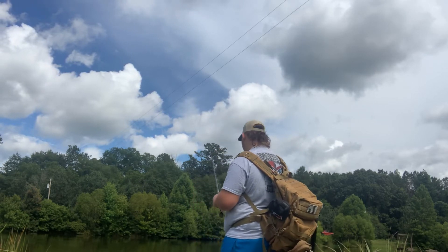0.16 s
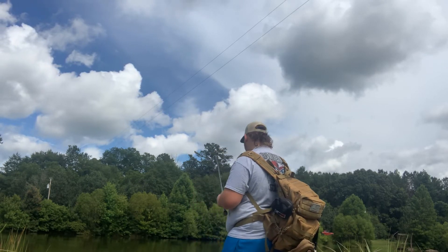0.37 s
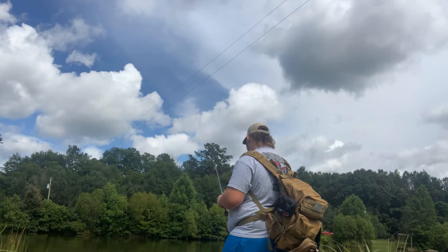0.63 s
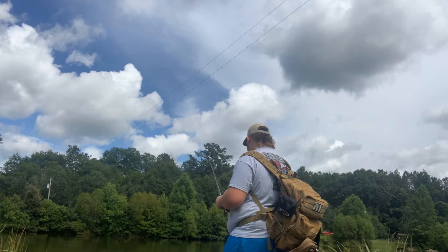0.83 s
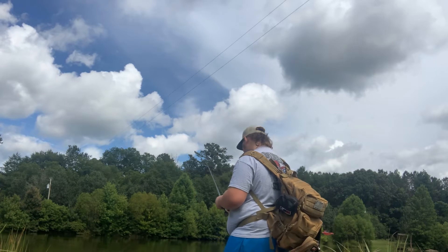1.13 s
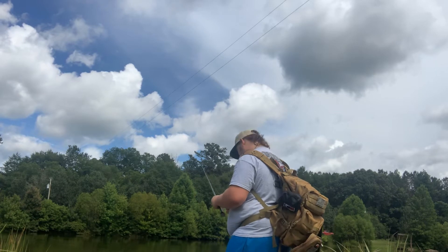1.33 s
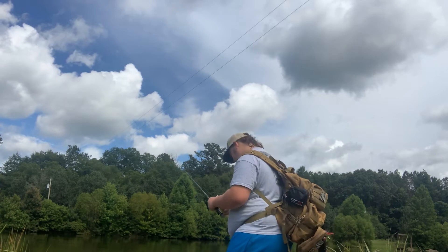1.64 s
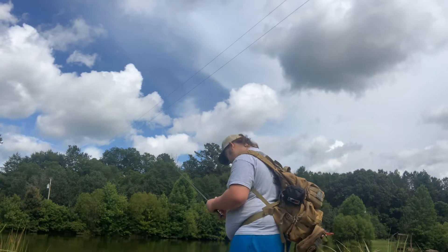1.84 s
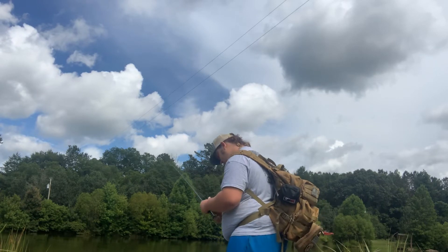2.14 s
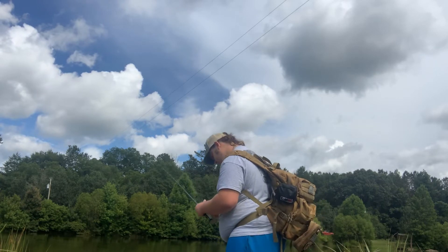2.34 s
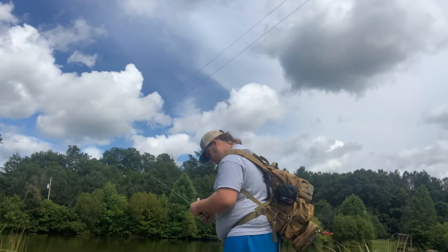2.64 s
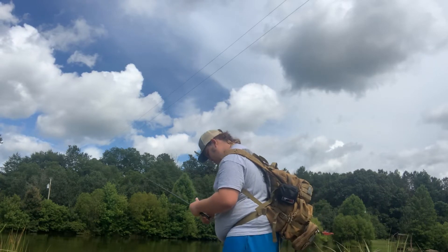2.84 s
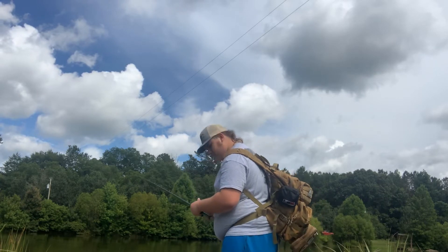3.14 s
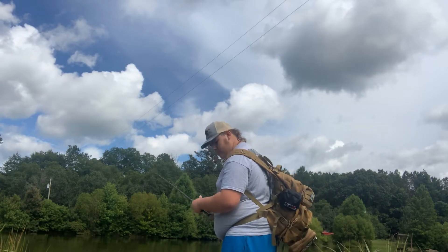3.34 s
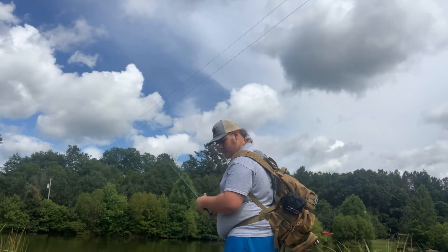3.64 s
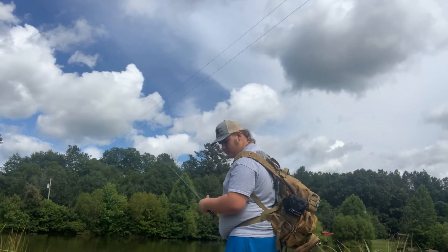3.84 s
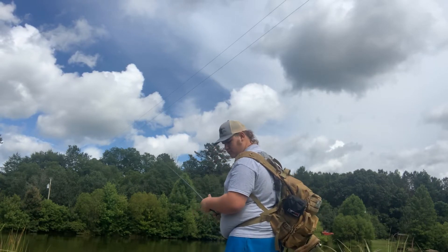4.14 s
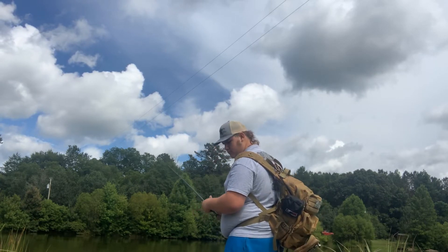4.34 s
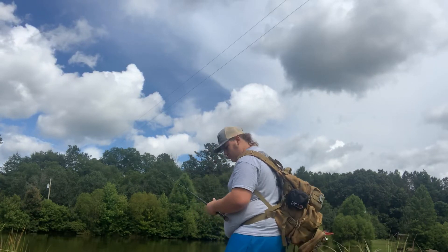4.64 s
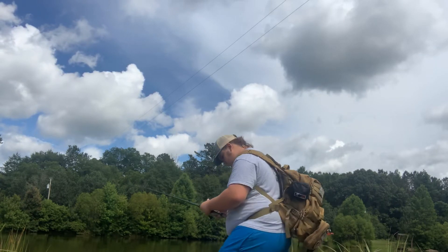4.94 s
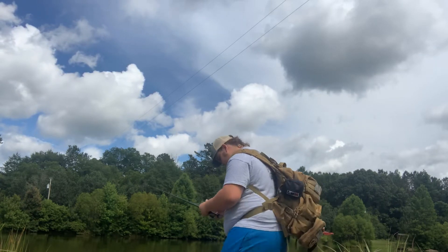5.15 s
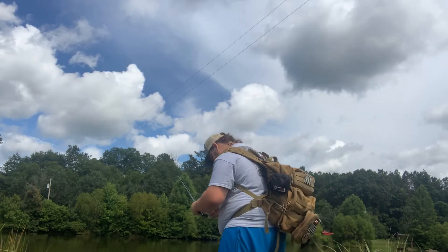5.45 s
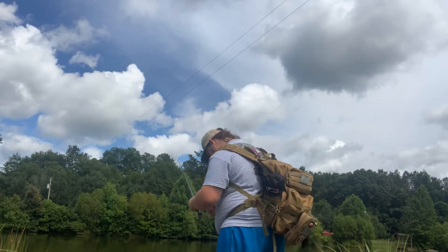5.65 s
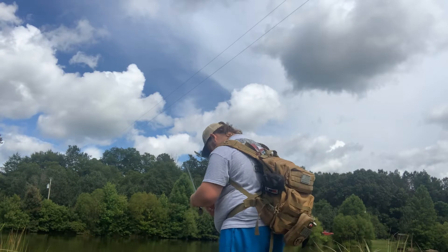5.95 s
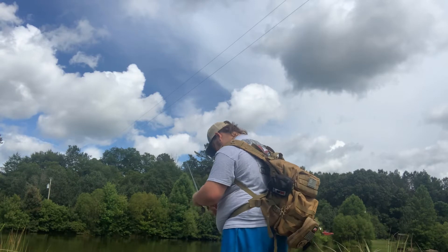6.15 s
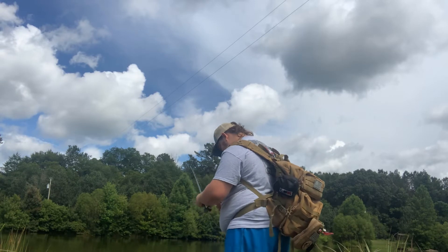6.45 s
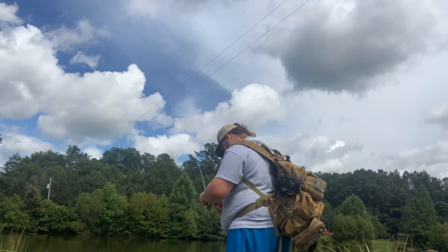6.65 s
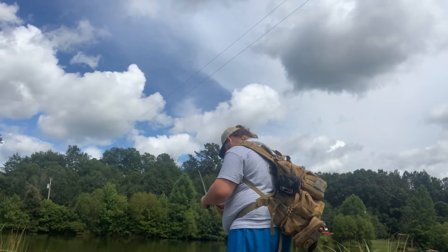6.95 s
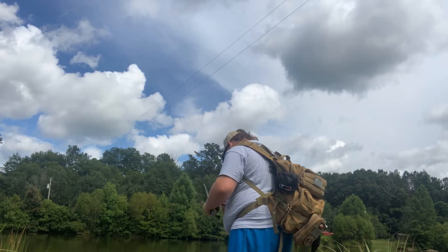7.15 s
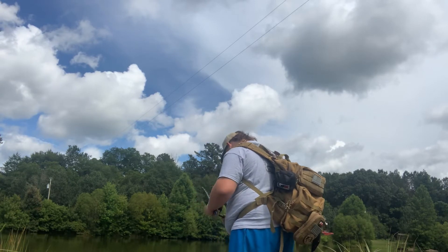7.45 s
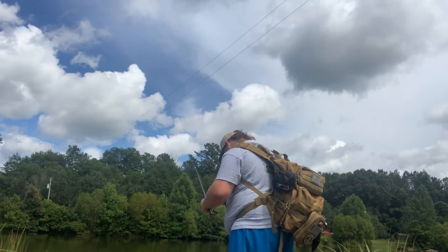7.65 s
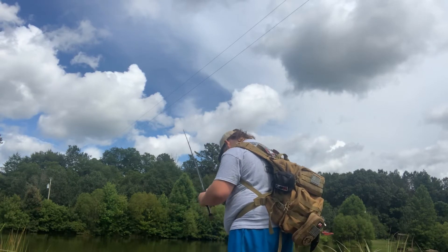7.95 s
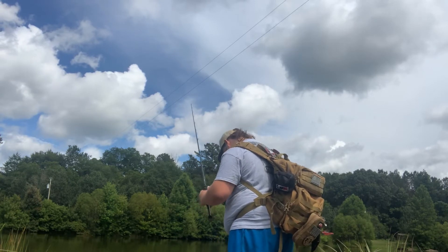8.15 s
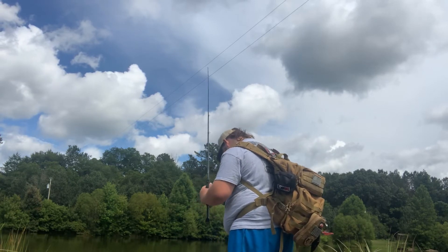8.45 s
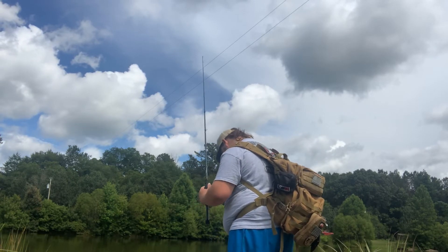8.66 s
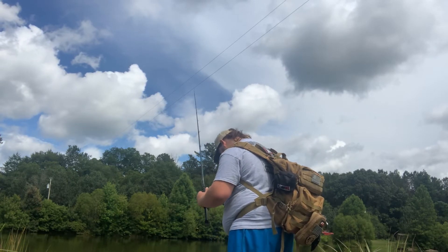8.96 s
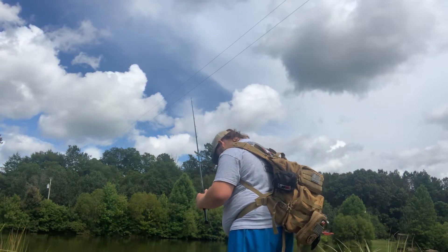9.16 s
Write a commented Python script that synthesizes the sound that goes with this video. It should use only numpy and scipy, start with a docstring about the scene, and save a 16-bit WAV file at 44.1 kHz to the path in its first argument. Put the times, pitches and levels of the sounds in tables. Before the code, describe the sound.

Beside a pond, a far engine throbs away as someone steps through crackling stems, over soft insect buzz and swallow twitter.

```python
"""At the edge of a pond, one microphone. On a far road beyond the water a vehicle drones past,
its exhaust note and drive-line whine sinking as it recedes. A few steps away an angler shifts
in the reeds: wet ground pops underfoot, dry stems snap and rustle. Cicadas buzz with their
ribbed drums, crickets trill, and swallows twitter over the water, echoed by pond and trees."""
import sys
import numpy as np
from scipy import signal
from scipy.io import wavfile
from scipy.ndimage import uniform_filter1d, map_coordinates

SR = 44100
rng = np.random.default_rng(int(sys.argv[2]) if len(sys.argv) > 2 else 0)


def master_out(mix):
    """Clip the mix to full scale and print it as 16-bit PCM to the path in sys.argv[1]."""
    frames = np.transpose(np.atleast_2d(mix))
    ceiling = np.clip(frames, -1, 1)
    pcm = np.round(ceiling * 32767).astype(np.int16)
    wavfile.write(sys.argv[1], SR, pcm)


N = 409688
T = np.arange(N) / SR

# exhaust note from across the pond: (time [s], level [dB])
EXHAUST_LEVEL = [(0, -36), (.5, -44), (.8, -35.5), (1.05, -41), (1.45, -34.5), (1.75, -36.5), (2.07, -43.5),
                 (2.4, -36.5), (3.3, -36), (3.8, -42.5), (4.02, -51), (4.3, -43), (5.1, -40.5),
                 (6.15, -39.5), (6.45, -52.5), (6.8, -42), (7.7, -47), (8.25, -57), (8.6, -48), (9.05, -49),
                 (9.29, -66)]
# spells in which it throbs: (first crest [s], last crest [s], throbs [count], depth [0-1])
EXHAUST_THROBS = [(.14, 1.47, 4, .92), (2.42, 3.87, 8, .45)]
# drive line: (time [s], whine [dB], its half order [dB], low drone [dB])
DRIVE_LEVELS = [(0, -62, -70, -45.5), (.45, -62.5, -60, -40.5), (.76, -60.5, -44.5, -40.5),
                (.88, -52, -42.5, -38), (1.5, -49.5, -37, -43.5), (1.75, -58.5, -41.5, -45),
                (2.0, -53.5, -39.5, -49), (2.25, -60.5, -42, -44.5), (2.5, -70.5, -46.5, -50),
                (3.2, -59, -49.5, -50), (4.0, -67, -58.5, -44), (4.7, -64.5, -48, -52),
                (5.5, -67, -55, -46), (6.3, -62.5, -81, -50), (7.1, -67, -65, -59), (7.55, -61, -76, -54),
                (8.2, -69, -76, -70), (9.29, -67.5, -53, -67)]
# drive-line whine: (time [s], pitch [Hz])
WHINE_PITCH = [(0.0, 425.7), (1.2, 413.0), (2.1, 403.4), (3.2, 390.2), (4.6, 376.2), (5.6, 356.0),
               (9.3, 345.0)]
# rough howl on the approach: (time [s], pitch [Hz], level [dB])
APPROACH_HOWL = [(.3, 844, -71), (.4, 840, -53.5), (.55, 804, -52), (.68, 818, -56), (.78, 796, -75)]
# far road, with a swell near 5 s as the angler moves: (time [s], low roar [dB], hiss [dB])
ROAD_LEVELS = [(0, -39, -53), (1.5, -36.5, -56), (2.7, -40.5, -57), (3.4, -48.5, -60.5), (5, -44.5, -56.5),
               (6.9, -56, -62), (9.29, -55, -64.5)]
# low roar: (frequency [Hz], relative level [dB])
ROAR_SPECTRUM = [(24, -35), (40, -8), (65, -8), (139, -0.5), (209, -2.5), (399, -17), (460, -32),
                 (571, -35.5), (700, -27.5), (910, -52), (1540, -120)]
# road hiss: (frequency [Hz], relative level [dB])
HISS_SPECTRUM = [(260, -44.5), (450, -3), (593, -10), (712, -0.5), (1040, -3), (1590, -6), (2520, -25.5),
                 (2800, -23), (3640, -23), (6160, -120)]
# wet ground, close by: (time [s], level [dB], ring [Hz], time to fall 60 dB [s])
GROUND_POPS = [(1.891, -35, 1300, .013), (2.144, -34, 795, 0.015), (2.145, -27.5, 580, 0.017),
               (2.646, -39.5, 600, 0.023), (2.643, -41.5, 1330, 0.018), (4.704, -41, 1360, 0.056),
               (4.761, -30, 1520, 0.024), (4.763, -29.5, 685, 0.058), (4.785, -29, 1660, 0.023),
               (4.788, -27, 730, 0.063), (4.828, -31.5, 1040, 0.034), (4.902, -34, 1160, .018),
               (4.907, -35, 1300, 0.013), (4.964, -38, 1220, 0.035), (5.044, -38, 1110, 0.035),
               (5.067, -35, 702, 0.049), (5.109, -39.5, 1390, 0.028), (5.131, -41, 1800, .025),
               (5.144, -26.5, 687, 0.021), (5.16, -35.5, 496, 0.023), (5.186, -28.5, 383, 0.039),
               (5.387, -42, 1370, .033), (5.568, -43.5, 900, 0.06)]
# dry stems breaking: (time [s], level [dB], ring [Hz])
STEM_SNAPS = [(0.969, -50.5, 6300), (1.893, -55, 6600), (4.752, -46, 6150), (4.761, -44, 4050),
              (4.785, -41, 5400), (4.8064, -44, 5440), (4.8165, -33, 3020), (4.825, -36, 5300),
              (4.8334, -42, 5700), (4.9016, -36, 5400), (4.9143, -41, 6160), (4.9189, -32.5, 3620),
              (4.9244, -38, 6060), (4.936, -42, 3500), (5.11, -39, 5100), (5.1396, -38, 3320),
              (5.1598, -43, 3320), (5.1744, -44, 6790), (5.202, -43, 3190), (5.2423, -40.5, 6160),
              (5.271, -36.5, 6360), (5.3028, -36, 8500), (5.3117, -35.5, 6040), (5.336, -33.5, 5070),
              (5.4053, -39, 3100), (5.5994, -52, 5170), (6.1486, -44, 6300), (6.179, -41.5, 5730),
              (6.7294, -50, 5810)]
# brushes through the reeds: (loudest moment [s], swell time constant [s], fizz [dB], body [dB])
REED_BRUSHES = [(4.82, 0.018, -56, -55), (4.915, 0.017, -53, -54.5), (5.05, 0.015, -57, -56),
                (5.14, 0.02, -53.5, -52.5), (5.23, .012, -62, -63), (5.3, 0.023, -50, -59),
                (5.39, 0.02, -60, -55), (5.605, 0.0054, -55, -68), (6.165, 0.013, -66, -67)]
# fizz of brushed stems: (frequency [Hz], relative level [dB])
FIZZ_SPECTRUM = [(2350, -48), (4000, -20), (4660, -2), (5050, -3), (6020, -1), (7600, -9), (8760, -4),
                 (15600, -37)]
# two cicadas: (time [s], first [dB], second [dB])
CICADA_LEVELS = [(0, -65, -79), (.7, -63.5, -74), (1.9, -63, -75), (2.6, -67.5, -78.5), (3.2, -67, -75),
                 (4.3, -73.5, -78), (5.4, -68, -72), (6.1, -66.5, -71.5), (6.45, -67.5, -62.5),
                 (6.95, -68.5, -63), (7.1, -69.5, -72), (9.29, -73, -80.5)]
# one song each: (opening clicks [1/s], closing clicks [1/s], clicks a stroke [count],
# roughness [0-1], drum modes as (frequency [Hz], width [Hz], relative level [dB]))
CICADA_SONGS = [(330.5, 342, 7.75, 0.6, [(4613, 320, -6), (4940, 570, -2.5), (5630, 230, -7),
                (5940, 400, -1.5), (6330, 190, -2), (6570, 160, -7.5)]),
                (349, 300, 3.1, 0.25, [(4800, 340, -7), (5774, 380, 0), (6140, 89, -6.5), (6930, 150, -20),
                (7390, 150, -20.5)])]
# cricket trills: (pitch [Hz], pulses [1/s], level [dB], end [s])
CRICKET_TRILLS = [(8080, 30, -83, 9.3), (10240, 71, -89, 4.7)]
# swallow chirps over the water: (time [s], level [dB], centre [Hz], glide [Hz], length [s])
SWALLOW_CHIRPS = [(0.528, -59.0, 4860, 1500.0, 0.02), (0.707, -66, 3280.0, 1597, 0.012),
                  (0.772, -61.5, 5620, 1499, 0.051), (0.855, -64, 5380.0, 1497, 0.018),
                  (1.64, -62.0, 5800, 1196, 0.026), (1.766, -61, 6280.0, 900.0, 0.013),
                  (1.952, -59, 6220.0, 603, 0.018), (1.967, -65, 3380, 400.0, 0.014),
                  (2.074, -60, 5900, 304, 0.027), (2.172, -61, 5500, 902, 0.028),
                  (2.8, -61, 5530, 903, 0.012), (2.891, -68, 3120, 596, 0.014),
                  (2.908, -61, 6100, 296, 0.056), (3.025, -67, 3400.0, 798, 0.013),
                  (3.222, -69, 3220, 691, 0.018), (3.24, -69, 3280.0, 1200.0, 0.038),
                  (3.574, -68, 3200, 607, 0.023), (3.69, -66, 3720, 1297, 0.028),
                  (3.701, -66.5, 3150, 388, 0.047), (4.462, -65.5, 3540, 1002, 0.025),
                  (4.684, -60, 3170, -2, 0.0091), (5.517, -63, 4480.0, 1800.0, 0.02),
                  (5.623, -67, 3700.0, 1600.0, 0.053), (5.647, -65.0, 4450, 1800.0, 0.02),
                  (5.658, -66, 4960.0, 300.0, 0.013), (5.694, -61, 4870, 597, 0.012),
                  (5.77, -61.5, 4670, 1500.0, 0.014), (5.808, -69, 3760, 1194, 0.032),
                  (6.013, -65, 3100.0, 499, 0.014), (6.03, -59.5, 4780, 1200.0, 0.013),
                  (6.031, -62, 3400, 1000.0, 0.016), (6.308, -63, 3240, 700.0, 0.021),
                  (6.325, -61, 3070, 400.0, 0.018), (6.424, -63, 3280.0, 1000.0, 0.044),
                  (6.463, -62.0, 3100.0, 400.0, 0.014), (6.503, -63, 3660, 1600.0, 0.014),
                  (6.512, -57, 5300, 300.0, 0.012), (6.626, -66, 3960, 1800.0, 0.06),
                  (6.671, -59, 3600, 1200.0, 0.013), (7.121, -65, 3520.0, 1200.0, 0.01),
                  (7.4, -66, 5900, -600.0, 0.038), (7.79, -63, 5800, 1200.0, 0.017),
                  (7.973, -65.5, 3260, 600.0, 0.021), (8.1, -66, 5660, -600.0, 0.042),
                  (8.14, -64, 3180, 400.0, 0.028), (8.163, -66, 3010, 403, 0.015),
                  (8.9, -74, 3300.0, 500.0, 0.018)]
# raspy chips: (time [s], level [dB], centre [Hz], glide [Hz], length [s])
RASPY_CHIPS = [(6.058, -70, 6080, 0, 0.027), (7.879, -61, 5700, -300, 0.046),
               (7.907, -64, 6340, 700, 0.036), (8.05, -61.5, 5850, 500, 0.031),
               (8.239, -61, 5600, -700, 0.03), (8.53, -67, 5400, -300, .02), (8.921, -62, 5500, -2, 0.031)]
# longer whistles, one list each: (time [s], pitch [Hz], level [dB], second harmonic [dB])
BIRD_WHISTLES = [
    [(8.012, 1965, -63, -90), (8.04, 1836, -66, -90), (8.06, 1910, -60, -93), (8.085, 2050, -59, -75),
     (8.108, 1940, -66, -90)],
    [(8.8, 2250, -74, -90), (8.83, 2100, -67, -76), (8.862, 1985, -56, -73), (8.876, 2150, -70, -72),
     (8.89, 2080, -64, -68), (8.912, 1850, -50, -85)],
    [(9.01, 2000, -78, -90), (9.03, 2410, -72, -84), (9.055, 2400, -77, -76), (9.078, 1770, -63, -92)],
    [(7.855, 5600, -66, -99), (7.87, 6050, -59, -99), (7.895, 6000, -60, -99), (7.94, 6240, -62.5, -99),
     (7.967, 6000, -68, -99)],
]
# still air and far traffic: (frequency [Hz], relative level [dB])
AIR_SPECTRUM = [(13, -49), (22, -11), (58, -3.5), (97, 1), (154, -2.5), (267, -22.5), (352, -23.5),
                (476, -51), (1390, -23.5), (2610, -48), (3830, -48), (5790, -51.5), (7410, -53),
                (13900, -60.5), (15600, -96)]
# far machines: (pitch [Hz], width [Hz], level [dB])
MACHINE_HUMS = [(80.5, 1.4, -50), (87.2, 3.8, -54.5)]


def vehicle():
    """Engine and drive line on the far road; moving air on the long path makes them fade, and in spells the
    exhaust throbs."""
    receding_hz, sink_hz, sink_s, throb_fade_s = 130.8, 18.7, 4.0, 0.15
    throb = np.ones(N)
    for first, last, count, depth in EXHAUST_THROBS:
        spell = np.clip(np.minimum(T - first, last - T) / throb_fade_s + 1, 0, 1)
        throb += depth * spell * np.cos(2 * np.pi * count * (T - first) / (last - first))
    hz = receding_hz + sink_hz * np.exp(-T / sink_s) + 0.58 * wander(11)
    exhaust = throb * tone(hz, columns(EXHAUST_LEVEL)[0] + 1.5 * wander(25))
    whine_db, half_db, drone_db = columns(DRIVE_LEVELS)
    hz = columns(WHINE_PITCH)[0] + 1.414 * wander(13)
    whine = tone(hz, whine_db + 3.1 * wander(18)) + tone(hz / 2, half_db + 0.97 * wander(18))
    drone = tone(hz=74.8 - .66 * T + 0.48 * wander(8), db=drone_db + 2.0 * wander(13))
    howl_hz, howl_db = columns(APPROACH_HOWL)
    howling = (T > APPROACH_HOWL[0][0]) * (T < APPROACH_HOWL[-1][0])
    howl = howling * amp(howl_db) * wavering_tone(howl_hz, width=53)
    return exhaust + whine + drone + howl


def road():
    """Low roar and hiss of the far road, fading, with a swell near 5 s as the angler moves."""
    roar_db, hiss_db = columns(ROAD_LEVELS)
    roar = amp(roar_db) * noise(ROAR_SPECTRUM, patchy_db=0.94, size=4096)
    return roar + amp(hiss_db) * noise(HISS_SPECTRUM, patchy_db=2.0)


def wet_ground():
    """A few steps off, ground pops under the angler: dull rings that sink in pitch, over a crunch."""
    rise_cycles, grit_db = 1.9, -9
    out, t = np.zeros(N), np.arange(3000) / SR
    for start, db, hz, t60 in GROUND_POPS:
        sinking_hz = hz * (1 + 0.14 * np.exp(-t / 0.0012))
        ring = np.sin(2 * np.pi * np.cumsum(sinking_hz) / SR)
        grit = evened(resonate(resonate(rng.standard_normal(len(t)), hz, hz), 1.2 * hz, 2 * hz))
        envelope = np.minimum(t * hz / rise_cycles, 1) * amp(db - 60 * t / t60)
        add(out, start, envelope * (ring + amp(grit_db) * grit))
    return out


def reeds():
    """Close to the microphone, stems snap, crackle and fizz as the angler brushes through."""
    out, crackle = np.zeros(N), np.zeros(N)
    for start, db, hz in STEM_SNAPS:
        crack = snap(hz) + 0.25 * snap(min(1.6 * hz, 13000)) + 0.095 * snap(0.34 * hz)
        add(out, start, amp(db) * crack)
    for hz in np.geomspace(3000, 12000, num=12):  # small stems of many sizes
        strength = amp(5.9 * np.minimum(rng.exponential(1, N), 4))
        breaks = rng.random(N) < 40 / SR  # about 40 a second
        crackle += signal.oaconvolve(strength * breaks, snap(hz))[:N]
    fizz = evened(0.6 * evened(crackle) + noise(FIZZ_SPECTRUM, patchy_db=4.5, size=256))
    body = noise([(1200, 7.5), (2400, -10), (3300, 1.5), (4500, -19)], patchy_db=2.6, size=256)
    for crest, rise, fizz_db, body_db in REED_BRUSHES:
        brush = np.exp(-abs(T - crest) / np.where(T < crest, rise, 3.05 * rise))  # quick in, slow out
        out += brush * (amp(fizz_db) * fizz + amp(body_db) * body)
    return out


def snap(hz, t60=0.009):
    """One stem breaks: a burst of a few milliseconds ringing at hz, peak 1."""
    burst = rng.standard_normal(600) * amp(-60 * np.arange(600) / SR / t60)
    ring = resonate(burst, hz, 1250, 2700, 3200)
    return ring / abs(ring).max()


def cicadas():
    """Ribs buckle in each muscle stroke and ring the cicada's drum."""
    out = np.zeros(N)
    for db, (first, last, per_stroke, rough, modes) in zip(columns(CICADA_LEVELS), CICADA_SONGS):
        ribs = np.cumsum(np.linspace(first, last, N)) / SR
        stroke = 0.42 + np.sin(np.pi * (ribs / per_stroke % 1) ** 0.7) ** 2
        scrape = rough * np.exp(-(ribs % 1) / 0.68) * rng.standard_normal(N)
        clicks = 4.5 * (1 - rough) * np.diff(np.floor(ribs), prepend=0)
        far_chorus = .5 * rng.standard_normal(N)  # blurred into noise
        drive = evened(stroke * (scrape + clicks)) + far_chorus
        rebound = np.roll(drive, round(SR * per_stroke / first / 2))
        song = 0
        for hz, width, mode_db in modes:
            push = rebound if hz < 5200 else drive  # low modes sound as the drum springs back
            song += amp(mode_db) * resonate(push, hz, width, width) / np.sqrt(width)
        out += amp(db + .7 * wander(5)) * evened(song)
    return out


def crickets():
    """Each cricket pulses a thin, high tone."""
    out = np.zeros(N)
    for hz, per_s, db, end in CRICKET_TRILLS:
        pulses = np.sin(np.pi * per_s * T) ** 6 * (T < end)
        out += pulses * tone(hz + 15 * wander(43), db + 1.5 * wander(12))
    return out


def birds():
    """Chirps, raspy chips and whistles over the pond, with two echoes off water and trees."""
    calls = np.zeros(N)
    for start, db, hz, glide, length in SWALLOW_CHIRPS:
        add(calls, start, chirp(db, hz, glide, length))
    for start, db, hz, glide, length in RASPY_CHIPS:  # noise in a gliding resonance
        progress = np.linspace(0, 1, round(length * SR))
        rasp = resonate(rng.standard_normal(len(progress)), hz + glide * (progress - .5), 620, 690)
        add(calls, start, amp(db) * np.sin(np.pi * progress) * evened(rasp))
    for rows in BIRD_WHISTLES:
        start, end = rows[0][0], rows[-1][0]
        hz, db, second_db = columns(rows, np.arange(start, end, 1 / SR))
        hz = uniform_filter1d(hz, size=300, mode="nearest")
        whistle = tone(hz, db) + tone(2 * hz, second_db)
        add(calls, start, whistle * signal.windows.tukey(len(hz), .2))
    out = calls.copy()
    add(out, .017, .18 * calls)
    add(out, .041, .15 * calls)
    return out


def chirp(db, hz, glide, length):
    """One swallow note: a gliding near-sine with an uneven, slightly raspy level."""
    progress = np.linspace(0, 1, round(length * SR))
    rasp = 1 + .5 * evened(uniform_filter1d(rng.standard_normal(len(progress)), size=50))
    return rasp * np.sin(np.pi * progress) * tone(hz + glide * (progress - .5), db)


def far_flock():
    """Faint twitter from across the pond, blurred by echoes."""
    calls = np.zeros(N)
    for when, loud, pitch, glide, length in rng.random((90, 5)):
        note = chirp(-84 + 8 * loud, 2950 + 750 * pitch, 300 + 900 * glide, .014 + .02 * length)
        add(calls, when * T[-1], note)
    decay = amp(-60 * np.arange(3000) / SR / 0.083)
    echoes = rng.standard_normal(3000) * decay * (rng.random(3000) < .02)
    return calls + signal.oaconvolve(calls, echoes / np.linalg.norm(echoes))[:N]


def still_air():
    """The bed behind it all: still air, far traffic and the hum of far machines."""
    hums = sum(amp(db) * wavering_tone(hz, width) for hz, width, db in MACHINE_HUMS)
    return amp(-45.5) * noise(AIR_SPECTRUM, patchy_db=1.0, size=4096) + hums


def amp(db):
    """dB to gain."""
    return 10 ** (np.asarray(db) / 20)


def evened(x):
    """Scales to rms 1."""
    return x / np.sqrt(np.mean(x ** 2) + 1e-20)


def columns(rows, t=T):
    """Joins the rows of a table by straight lines in time, one curve a column."""
    times, *values = np.transpose(rows)
    return [np.interp(t, times, column) for column in values]


def add(mix, start, sound):
    """Mixes a sound in at start seconds."""
    part = mix[round(start * SR):][:len(sound)]
    part += sound[:len(part)]


def resonate(x, hz, *widths):
    """Resonances of gain 1 in series, one per width in Hz: shift hz to zero, smooth, shift back."""
    turn = np.exp(2j * np.pi * np.cumsum(hz * np.ones(len(x))) / SR)
    for width in widths:
        pole = np.exp(-np.pi * width / SR)
        x = 2 * (turn * signal.lfilter([1 - pole], [1, -pole], x / turn)).real
    return x


def wander(per_s):
    """A smooth random drift of rms 1, with per_s steps a second."""
    steps = rng.standard_normal(int(T[-1] * per_s) + 4)
    return evened(map_coordinates(steps, [T * per_s], order=3))


def noise(spectrum, patchy_db, size=1024):
    """Noise of rms 1 shaped by (frequency [Hz], level [dB]) rows, with drifting louder patches."""
    hz = np.fft.rfftfreq(size, 1 / SR)
    real, imag, patches = rng.standard_normal((4 * N // size + 5, len(hz), 3)).T
    patches = evened(uniform_filter1d(uniform_filter1d(patches, size=10, axis=0), size=10, axis=1))
    knots_hz, db = np.transpose(spectrum)
    shape_db = np.interp(np.log(hz + 1), np.log(knots_hz + 1), db, left=-120, right=-120)
    frames = (real + 1j * imag) * amp(shape_db[:, None] + patchy_db * patches)
    return evened(signal.istft(frames, nperseg=size, noverlap=3 * size // 4)[1][:N])


def tone(hz, db):
    """A sine on a pitch curve at an rms level."""
    return np.sqrt(2) * amp(db) * np.sin(2 * np.pi * np.cumsum(hz) / SR)


def wavering_tone(hz, width):
    """Noise in a narrow resonance, rms 1."""
    return evened(resonate(rng.standard_normal(N), hz, width, width))


def scene():
    """Near and far sources meet at one microphone on the bank."""
    angler = wet_ground() + reeds()
    return (vehicle() + road() + angler + cicadas() + crickets() + birds() + far_flock() + still_air())[None]


def record(dry):
    """The microphone loses the deepest bass; a band limit takes off the highest treble."""
    low_cut_hz, band_limit_hz = 46, 15700
    thinned = signal.sosfilt(signal.butter(4, low_cut_hz, "high", fs=SR, output="sos"), dry)
    lowpass = signal.firwin(511, band_limit_hz, window=("kaiser", 9), fs=SR)
    return signal.oaconvolve(thinned, lowpass[None], "same")


dry = scene()
out = record(dry)
master_out(out)
```